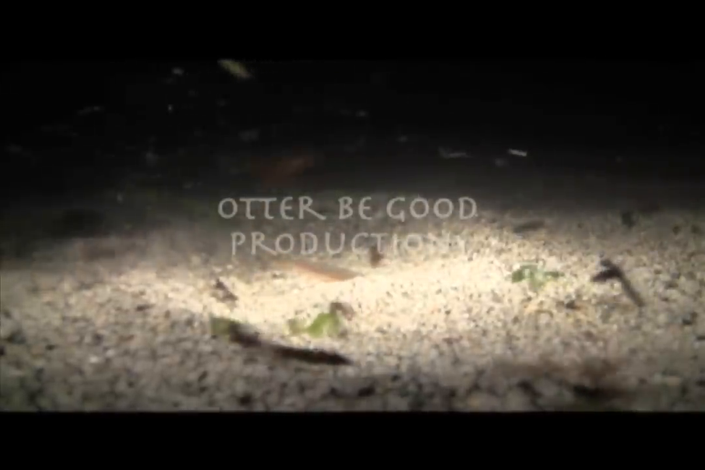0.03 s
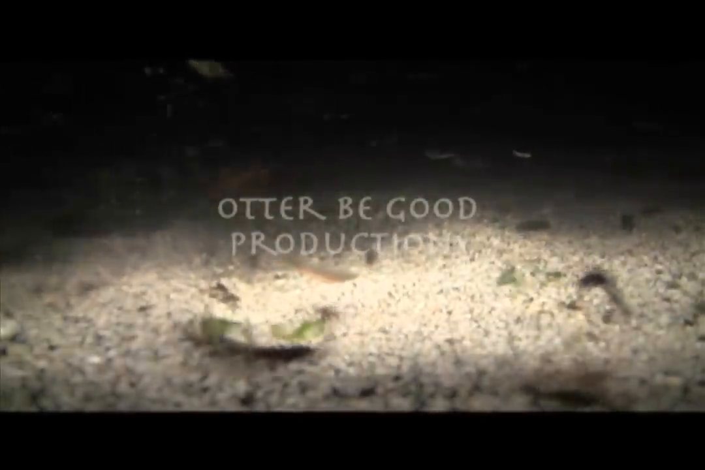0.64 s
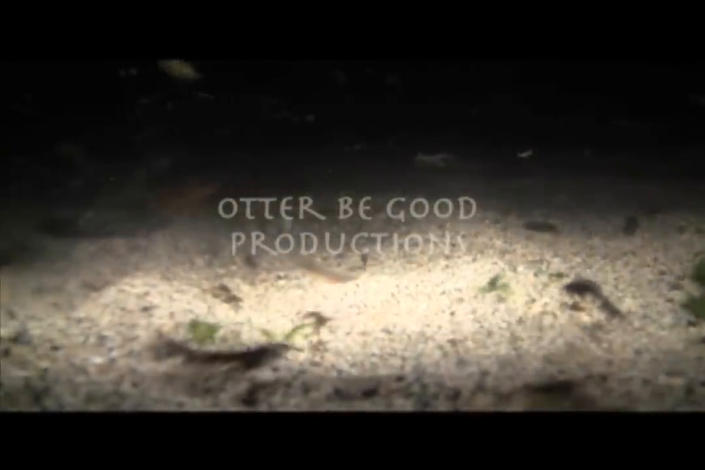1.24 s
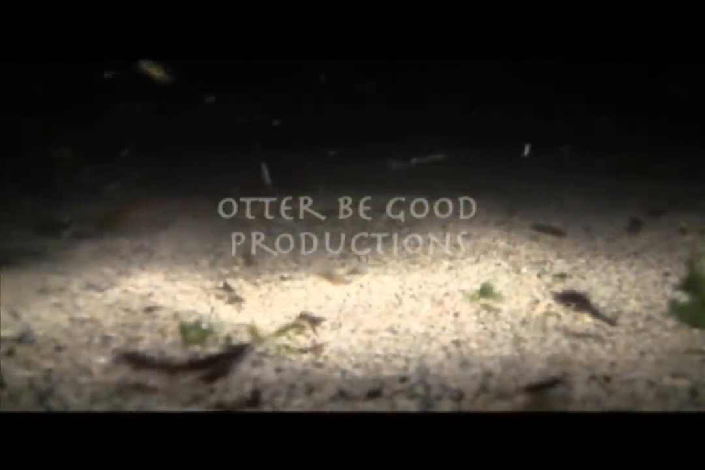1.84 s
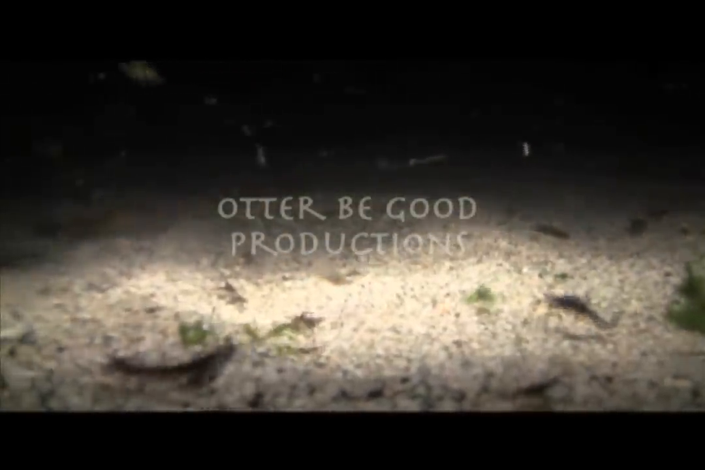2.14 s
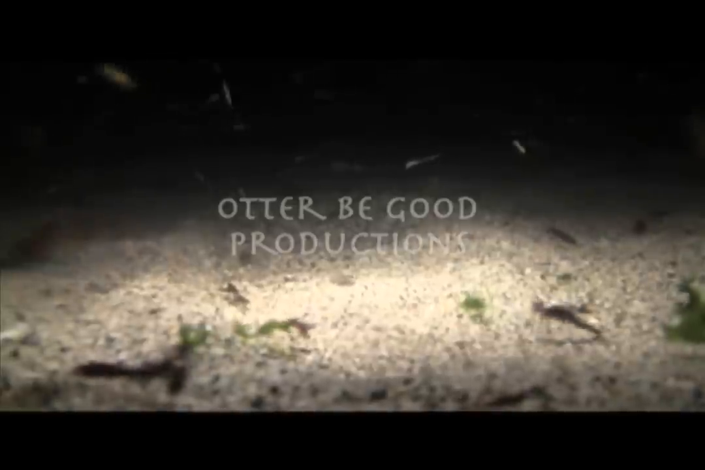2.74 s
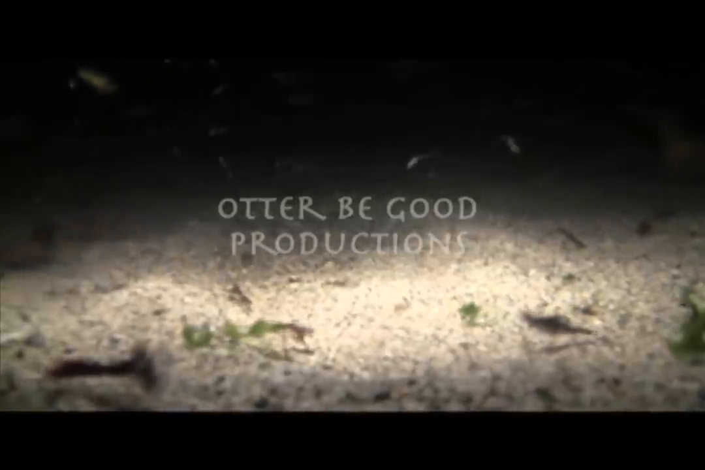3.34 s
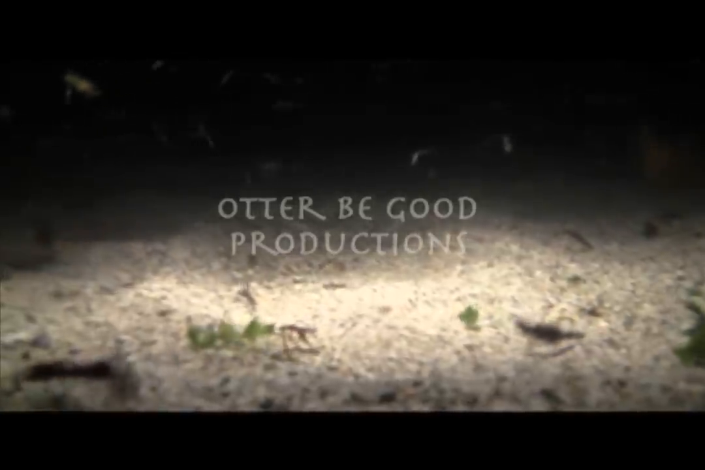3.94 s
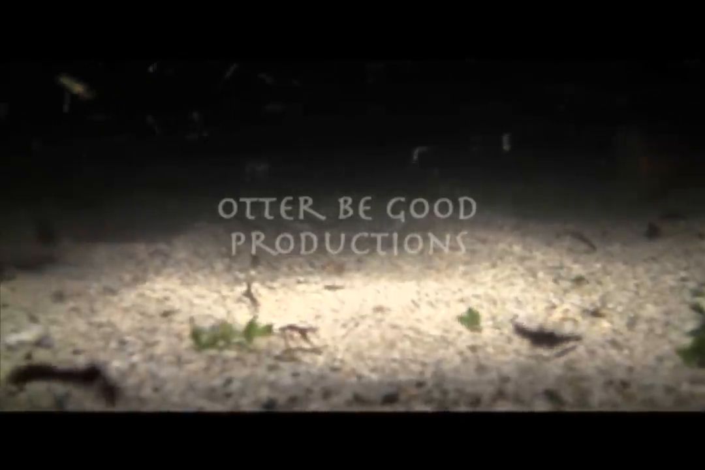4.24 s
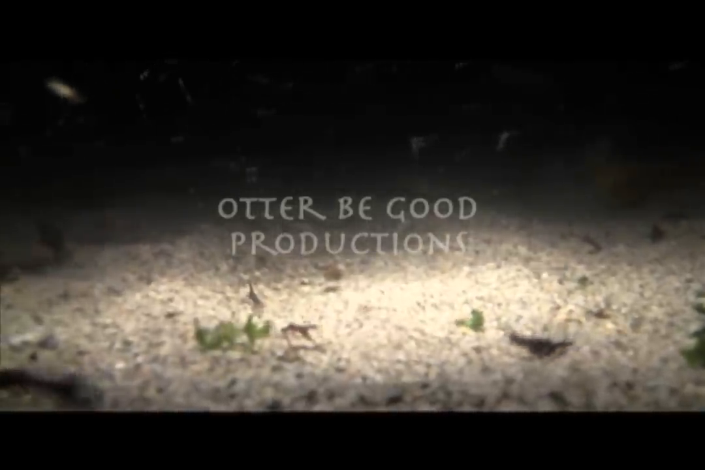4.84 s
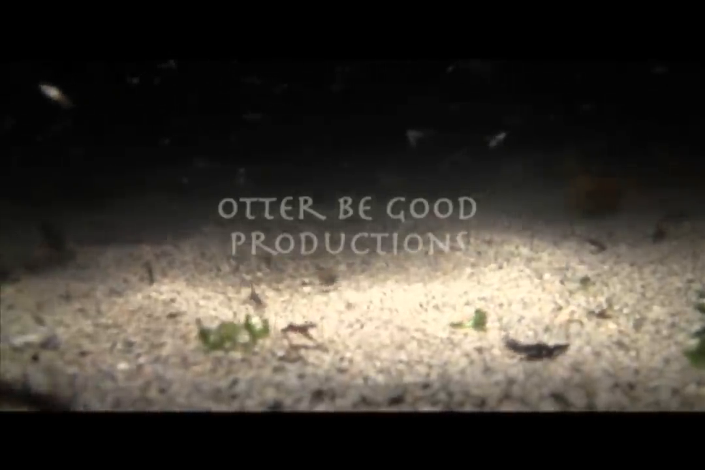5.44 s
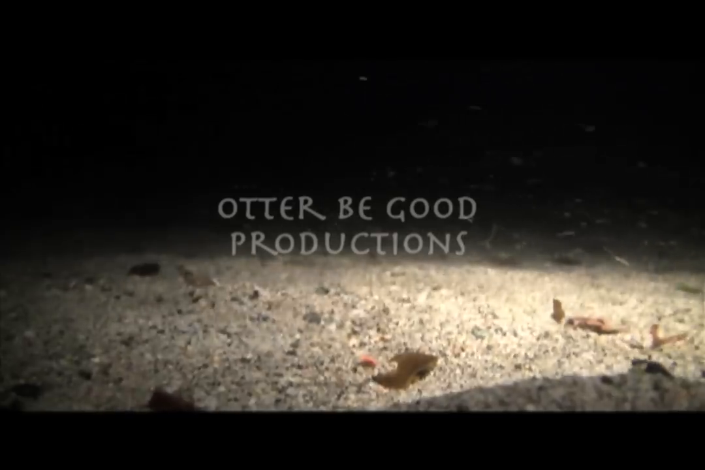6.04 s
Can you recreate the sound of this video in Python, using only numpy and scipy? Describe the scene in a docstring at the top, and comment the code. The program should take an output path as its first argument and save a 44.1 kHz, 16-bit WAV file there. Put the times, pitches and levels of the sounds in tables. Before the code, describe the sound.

Dull, irregular handling thumps and deep water rumble heard from inside a waterproof camera housing, then a sudden switch to soft hiss.

```python
"""Underwater, over a sandy bottom: a hand-held camera in a waterproof case. Handling knocks and a patter of
moving water ring the case; grit ticks against it. These sounds, over a low pressure surge and the camera's dull
hiss and whine, have no treble above about 3 kHz. Near the end, a cut to calmer, quieter water under a brighter,
slightly louder hiss with a brief rustle."""
import sys
import numpy as np
from scipy import signal
from scipy.fft import rfft, irfft, next_fast_len
from scipy.io import wavfile

SR = 44100
rng = np.random.default_rng(int(sys.argv[2]) if len(sys.argv) > 2 else 0)


def master_out(mix):
    """Clip the mix to full scale and print it as 16-bit PCM to the path in sys.argv[1]."""
    frames = np.transpose(np.atleast_2d(mix))
    ceiling = np.clip(frames, -1, 1)
    pcm = np.round(ceiling * 32767).astype(np.int16)
    wavfile.write(sys.argv[1], SR, pcm)


N = 269010
TIME_S = np.arange(N) / SR

# Table levels are relative; each source adds its gain.
# water flow past the case: t/s, level/dB
FLOW = [(0.0, -48.5), (0.51, -47), (0.87, -40), (1.27, -42.5), (1.66, -36.5), (1.78, -35.5), (2.12, -37),
        (2.4, -34), (2.57, -39.5), (3.14, -41.5), (3.33, -39), (3.53, -36), (4.3, -35.5), (4.38, -36.5),
        (5.05, -35.5), (5.37, -40.5), (5.56, -47)]
# modes of the water-loaded case: f/Hz, width/Hz, level/dB, left minus right/dB
CASE_MODES = [(32, 17, 0, 7.5), (50.93, 26, -3, -9), (87, 16, -13.5, 4), (138, 41, -4.5, -1),
              (171, 17, 0.5, -5.5), (215.2, 28.8, 0.5, -0.5), (269.6, 49, -9, -4), (303, 22, -8, 2.5),
              (385, 66, -18, -5), (473, 45, -17.5, 4), (583, 100, -22, 2.5), (636, 84, -21, -6),
              (699, 42, -22.5, 0), (905, 31, -33.5, 0.5), (1050, 150, -35.5, -6), (1340, 44, -41, -6.5)]
# wall transmission between modes: f/Hz, level/dB
WALL = [(10, -37), (30, -30.5), (130, -10.5), (260, -16.5), (340, -25.5), (500, -23), (540, -35.5),
        (690, -27), (790, -39.5), (1200, -62.5), (1650, -56.5), (3000, -73.5)]
# case sections that store a blow and return it late: f/Hz, width/Hz
CASE_LAGS = [(305, 70), (750, 280)]
# sideways rocking re plain ringing: f/Hz, level/dB
ROCKING = [(25, -18), (60, -9.5), (103, 3.5), (140, -8), (215, -21.5), (330, -17), (650, -14.5),
           (850, -1.5), (1500, 2)]
# surge spectrum: f/Hz, level/dB
SURGE_SPECTRUM = [(10, -24), (22, -4), (33, -1.5), (52, -8), (70, -6), (100, -9.5), (140, -27),
                  (250, -61.5), (600, -100)]
# surge balance: f/Hz, left minus right/dB
SURGE_PAN = [(25, -1), (35, -1.5), (50, -7.5), (90, -3.5)]
# camera hiss: f/Hz, level/dB
DULL_SPECTRUM = [(100, -3), (300, 5.5), (850, 4), (1100, 1.5), (1400, -4), (1800, -5), (2300, -8.5),
                 (2700, -11.5), (3100, -14.5)]
# camera whine: f/Hz, level/dB
WHINE_TONES = [(1916, -83), (2288, -80.5), (2536, -88)]
# handling knocks: t/s, level/dB, hardness as tilt/(dB/octave)
KNOCKS = [(0.026, -26.5, -4.5), (0.199, -33, -6), (0.301, -36, 4), (0.54, -38.5, 8.5), (0.878, -32, 0.5),
          (1.164, -33.5, 6.5), (1.257, -34, 4.5), (1.363, -27.5, 2), (1.435, -23.5, 0.5),
          (1.64, -26.5, 3.5), (1.724, -25.5, 4), (1.787, -25, -2.5), (1.846, -23, -2), (1.859, -9, -1.5),
          (2.16, -24.5, 3.5), (2.237, -15, 0), (2.325, -27, 4.5), (2.393, -29, 3.5), (2.43, -23.5, 5.5),
          (2.449, -16.5, 0), (2.468, -7, 2), (2.783, -40, 17.5), (3.024, -25.5, -0.5), (3.422, -19.5, 3),
          (3.609, -28.5, 5.5), (3.688, -24, 5), (3.788, -31, 4), (3.866, -26.5, -4.5), (3.95, -23, -2),
          (4.175, -22.5, 4), (4.355, -32.5, 8.5), (4.38, -24.5, 5.5), (4.434, -30, 11), (4.551, -17.5, 1.5),
          (4.817, -11, 1), (4.978, -25, 4.5), (5.086, -23, -2.5), (5.172, -26, -2), (5.276, -23.5, 1.5),
          (5.52, -26, -5)]
# grit on the case: t/s, level/dB, f/Hz, t60/s
GRIT_TICKS = [(0.066, -55, 1930, 0.093), (0.862, -51.5, 1380, 0.11), (2.323, -54.5, 1970, 0.066),
              (4.491, -53.5, 1930, 0.089)]
# bright hiss, base spectrum: f/Hz, level/dB
BRIGHT_SPECTRUM = [(30, -20), (90, -12), (170, -3), (400, -1), (750, -8), (1100, -2), (1900, -5),
                   (2350, -11), (3100, -11), (3600, -15), (4200, -10), (5200, -18), (8000, -23),
                   (15500, -28)]
# its resonances: f/Hz, width/Hz, boost/dB
BRIGHT_PEAKS = [(1155, 29, 4.8), (1380, 50, 2.5), (2046, 150, 9.7), (2500, 47, 5.6), (3960, 180, 3.4),
                (4320, 77, 1.4), (4700, 69, 2), (7230, 180, 8.3)]
# its steady and rustling parts re the base: f/Hz, level/dB
STEADY_EQ = [(400, 10.3), (900, 8.7), (1700, 4.5), (2500, 8.6), (9000, 11.3)]
RUSTLE_EQ = [(100, -15.0), (500, -2), (1000, -8.0), (1900, -10.5), (2800, -14), (6000, -20)]
# left-right likeness of the noises: f/Hz, correlation
SURGE_CORR = [(40, 0.97), (65, 0.93), (105, 0.35)]
DULL_CORR = [(500, 0.72), (1800, 0.05)]
BRIGHT_CORR = [(60, -0.078), (180, 0.44), (550, -0.47), (1650, 0.96), (4970, 0.45), (15000, -0.28)]


def amp(db):
    return 10 ** (np.asarray(db) / 20)


def unit_rms(x):
    return x / np.sqrt(np.mean(x ** 2) + 1e-20)


def at_hz(table, hz):
    """Table lookup, linear in log frequency."""
    f, value = np.transpose(table)
    return np.interp(np.log(hz + 1), np.log(f + 1), value)


def at_samples(table):
    """Time table, interpolated per sample."""
    return np.interp(TIME_S, *np.transpose(table))


def add(mix, start_s, sound):
    part = mix[:, max(round(start_s * SR), 0):][:, :sound.shape[1]]
    part += sound[:, :part.shape[1]]


def bell(hz, centre_hz, width_hz):
    """Resonance curve, height 1."""
    return 1 / (1 + (1.81 * (hz - centre_hz) / width_hz) ** 2)


def minimum_phase(gain):
    """Earliest-starting impulse response with this gain."""
    cepstrum = irfft(np.log(gain + 1e-6))
    half = cepstrum.shape[-1] // 2
    cepstrum[..., 1:half] *= 2
    cepstrum[..., half + 1:] = 0
    return irfft(np.exp(rfft(cepstrum)))


def stereo_noise(spectrum_db, corr_table):
    """Noise of rms 1; spectrum_db is a function of frequency."""
    size = next_fast_len(N, True)
    hz = np.fft.rfftfreq(size, 1 / SR)
    left, independent = rfft(rng.standard_normal((2, size)))
    corr = np.clip(at_hz(corr_table, hz), -1, 1)
    right = corr * left + np.sqrt(1 - corr ** 2) * independent
    return unit_rms(irfft(np.array([left, right]) * amp(spectrum_db(hz)), size)[:, :N])


def waver(rate_hz):
    """Smooth random motion near rate_hz, rms 1."""
    size = next_fast_len(N, True)
    hz = np.fft.rfftfreq(size, 1 / SR)
    band = hz / rate_hz / (1 + (hz / rate_hz) ** 4)
    return unit_rms(irfft(rfft(rng.standard_normal(size)) * band, size)[:N])


def low_pass(x, edge_hz):
    taps = signal.firwin(1023, edge_hz, window=("kaiser", 8), fs=SR)
    return signal.oaconvolve(x, taps[None], "same", axes=1)


def case_ring(tilt_db_per_oct, bulk_db, knee_hz=260, soft_hz=1250, bulk_hz=110):
    """Stereo response of the case to one blow: harder gives more treble, heavier more bass."""
    hz = np.fft.rfftfreq(16384, 1 / SR)
    side = np.array([[0.5], [-0.5]])
    modes = sum((amp(db + side * pan) * bell(hz, f, width)) ** 2 for f, width, db, pan in CASE_MODES)
    power = amp(at_hz(WALL, hz)) ** 2 + modes
    treble_db = tilt_db_per_oct * np.log2(np.clip(hz / knee_hz, 1, 2))
    bass_db = bulk_db / (1 + (hz / bulk_hz) ** 4)
    contact = amp(treble_db + bass_db) / np.hypot(1, (hz / soft_hz) ** 2)
    prompt = minimum_phase(np.sqrt(power) * contact)
    # all-pass: rounds the attack
    lag_rad = sum(2 * np.arctan2(hz * width, f ** 2 - hz ** 2) for f, width in CASE_LAGS)
    return irfft(rfft(prompt) * np.exp(-1j * lag_rad)) / np.sqrt(power.mean())


def water_patter(gain_db=1.3, taps_per_s=120, spread_db=3, wash=0.7, rock_db=1, eddy_db=1.2, eddy_hz=10):
    """Taps and wash of eddying water ring the case, too light to move its bulk."""
    sizes = amp(spread_db * np.minimum(rng.exponential(1, (2, N)), 3))
    signs = rng.choice([-1, 1], (2, N))
    taps = sizes * signs * (rng.random((2, N)) < taps_per_s / SR)
    push, twist = unit_rms(taps) + wash * rng.standard_normal((2, N))
    hz = np.fft.rfftfreq(N, 1 / SR)
    twist = irfft(rfft(twist) * amp(at_hz(ROCKING, hz) + rock_db), N)
    force = np.array([push + twist, push - twist])
    ringing = signal.oaconvolve(force, case_ring(tilt_db_per_oct=2.5, bulk_db=-12), axes=1)[:, :N]
    return unit_rms(ringing) * amp(at_samples(FLOW) + gain_db + eddy_db * waver(eddy_hz))


def pressure_surge(level_db=-41, ref_flow_db=-38, db_per_flow_db=1.3, swell_db=2.5, swell_hz=6,
                   wake_db=-14, wake_rise_s=0.0092, wake_decay_s=0.045):
    """Slow pressure swings; they grow with the flow and as water sloshes after each knock."""
    swings = stereo_noise(lambda hz: at_hz(SURGE_SPECTRUM, hz), SURGE_CORR)
    pan_db = at_hz(SURGE_PAN, np.fft.rfftfreq(N, 1 / SR)) * np.array([[0.5], [-0.5]])
    surge_db = level_db + db_per_flow_db * (at_samples(FLOW) - ref_flow_db)
    power = amp(surge_db + swell_db * waver(swell_hz))[None] ** 2
    t = np.arange(SR) / SR
    wake = np.minimum(t / wake_rise_s, 1) * np.exp(-t / wake_decay_s)
    for start_s, db, _ in KNOCKS:
        add(power, start_s, (amp(db + wake_db) * wake[None]) ** 2)
    return irfft(rfft(swings) * amp(pan_db), N) * np.sqrt(power)


def camera_hiss(hiss_db=-56.0, whine_gain_db=1.0):
    """The camera's own dull hiss and faint whine."""
    hiss = amp(hiss_db) * stereo_noise(lambda hz: at_hz(DULL_SPECTRUM, hz), DULL_CORR)
    whine = np.zeros((2, N))
    for f, db in WHINE_TONES:
        cycles = f * TIME_S + rng.random((2, 1))
        whine += amp(db + whine_gain_db) * np.sqrt(2) * np.sin(2 * np.pi * cycles)
    return hiss + whine


def case_rocking(ringing, rock_db):
    """Sideways rocking adds ringing of opposite sign left and right."""
    hz = np.fft.rfftfreq(2 * N, 1 / SR)
    sway = irfft(1j * rfft(ringing.mean(0), 2 * N) * amp(at_hz(ROCKING, hz) + rock_db))[:N]
    return ringing + np.array([sway, -sway])


def handling_knocks(gain_db=28.0, bulk_db=0.5, bulk_db_per_db=0.61, lead_db=-15.5, lead_s=0.006,
                    scuff_gain=0.12, scuff_db_per_db=-0.5, scuff_s=0.02,
                    rebound_s=0.04, rebound_db=-18, rebound_db_per_oct=2):
    """The hand rubs, knocks, scuffs; the case rebounds once. Lighter blows: more scuff, less bass."""
    out = np.zeros((2, N))
    t = np.arange(-SR // 50, SR // 20) / SR
    rebounds = [(s + rebound_s, db + rebound_db, tilt + rebound_db_per_oct) for s, db, tilt in KNOCKS]
    for start_s, db, tilt in list(KNOCKS) + rebounds:
        friction = rng.standard_normal(len(t))
        lead = friction * (t < 0) * np.exp(-abs(t) / lead_s)
        scuff = friction * (t >= 0) * np.exp(-abs(t) / scuff_s)
        scuff_ratio = scuff_gain * amp(scuff_db_per_db * db)
        rub = amp(lead_db) * lead / np.linalg.norm(lead) + scuff_ratio * scuff / np.linalg.norm(scuff)
        force = ((t == 0) + rub) / np.hypot(1, scuff_ratio / 2)
        ring = case_ring(tilt, bulk_db + bulk_db_per_db * db)
        add(out, start_s + t[0], amp(db + gain_db) * signal.fftconvolve(ring, force[None], axes=1))
    return case_rocking(out, rock_db=-1.5)


def grit_ticks(width_hz=650, rise_s=0.0015):
    """Grit scratches the case, each tick in one high resonance."""
    out = np.zeros((2, N))
    t = np.arange(SR // 5) / SR
    hz = np.fft.rfftfreq(len(t), 1 / SR)
    for start_s, db, f, t60_s in GRIT_TICKS:
        white = rng.standard_normal((2, len(t)))
        scratch = unit_rms(irfft(rfft(white) * bell(hz, f, width_hz), len(t)))
        add(out, start_s, scratch * amp(db - 60 * t / t60_s) * np.minimum(t / rise_s, 1))
    return out


def bright_hiss(steady_db=-51.5, rustle_db=-49, crest_s=5.88, swell_db_per_s=8, release_s=0.018,
                flutter_db=2.2, flutter_hz=20):
    """Steady hiss with narrow resonances; a fluttering midrange rustle swells, then dies fast."""
    def base_db(hz):
        return at_hz(BRIGHT_SPECTRUM, hz) + sum(db * bell(hz, f, width) for f, width, db in BRIGHT_PEAKS)
    steady = stereo_noise(lambda hz: base_db(hz) + at_hz(STEADY_EQ, hz), BRIGHT_CORR)
    rustle = stereo_noise(lambda hz: base_db(hz) + at_hz(RUSTLE_EQ, hz), BRIGHT_CORR)
    t = TIME_S - crest_s
    swell = amp(rustle_db + swell_db_per_s * np.minimum(t, 0) + flutter_db * waver(flutter_hz))
    release = np.exp(-np.maximum(t, 0) / release_s)
    return amp(steady_db) * steady + swell * release * rustle


def scene(cut_s=5.587, fade_s=0.003, calm_db=-11, treble_edge_hz=3110):
    """Case sounds with no treble above about 3 kHz, then a cut to softer patter under the bright hiss."""
    after_cut = np.clip((TIME_S - cut_s) / fade_s, 0, 1)
    case = handling_knocks() + grit_ticks() + water_patter() * amp(calm_db * after_cut)
    bed = (pressure_surge() + camera_hiss()) * (1 - after_cut)
    bright = bright_hiss() * after_cut * amp([[-0.5], [0.5]])  # leans right
    return low_pass(case + bed, treble_edge_hz) + bright


def record(dry, floor_db=-99, edge_hz=15900):
    """White electronic noise, then the band limit."""
    return low_pass(dry + amp(floor_db) * rng.standard_normal((2, N)), edge_hz)


dry = scene()
out = record(dry)
master_out(out)
```